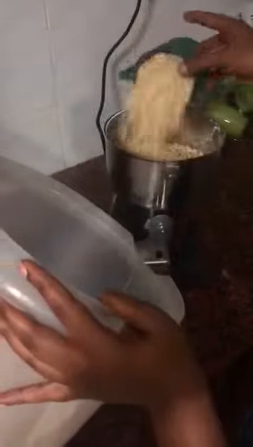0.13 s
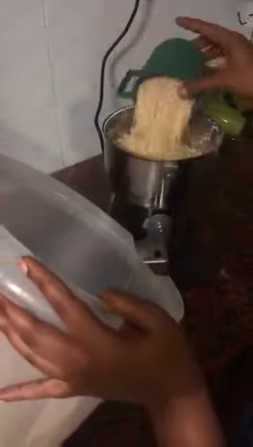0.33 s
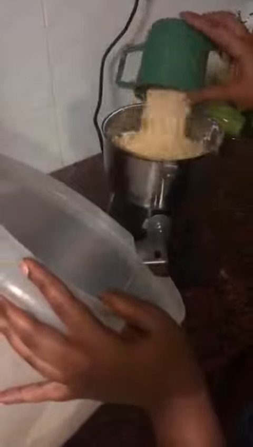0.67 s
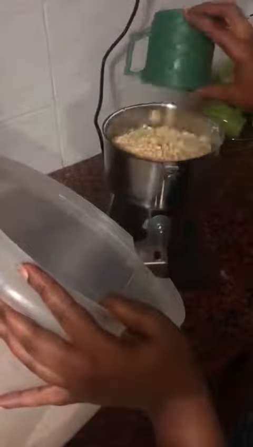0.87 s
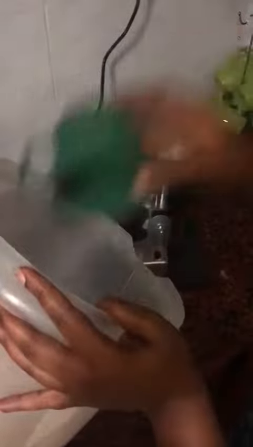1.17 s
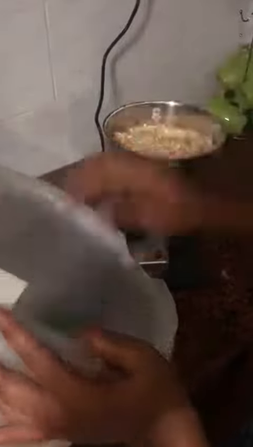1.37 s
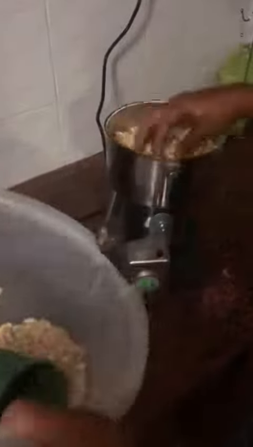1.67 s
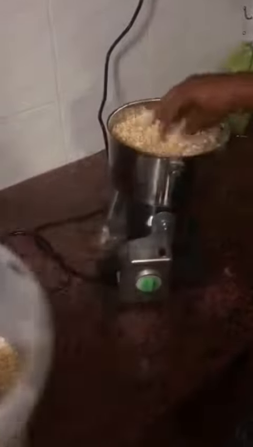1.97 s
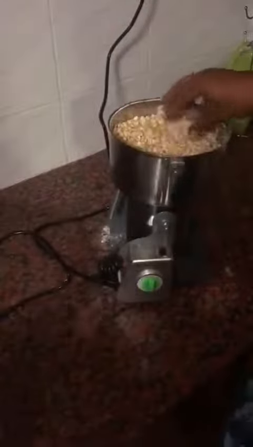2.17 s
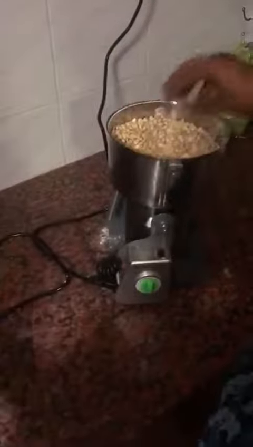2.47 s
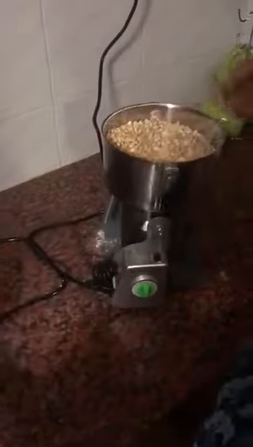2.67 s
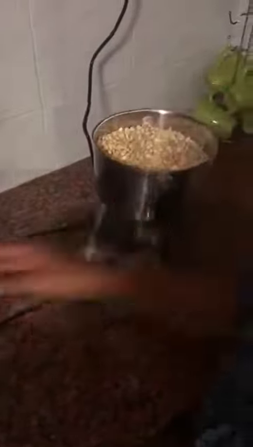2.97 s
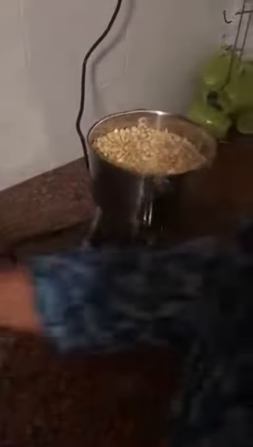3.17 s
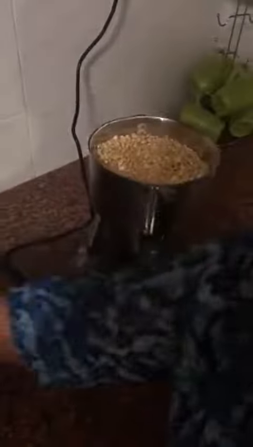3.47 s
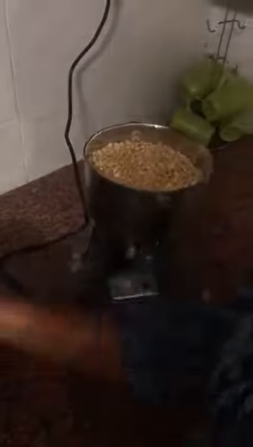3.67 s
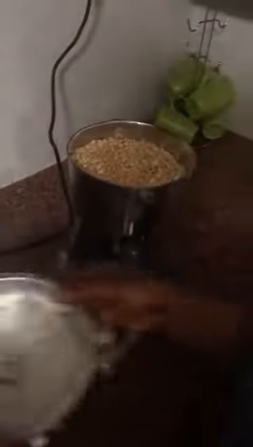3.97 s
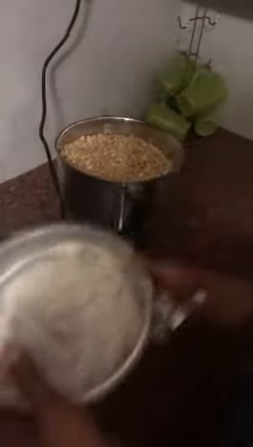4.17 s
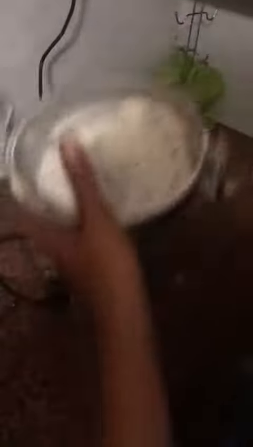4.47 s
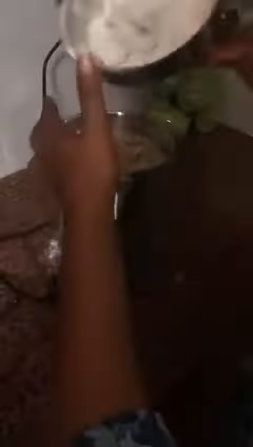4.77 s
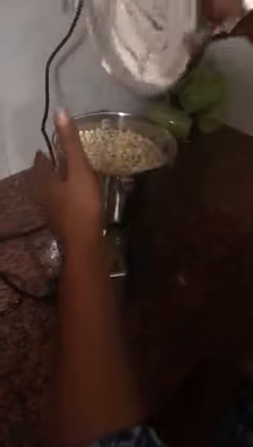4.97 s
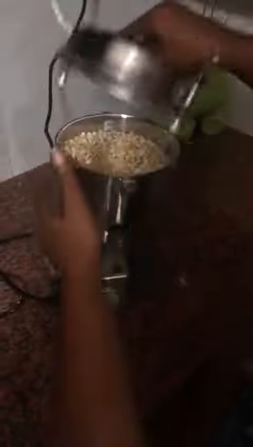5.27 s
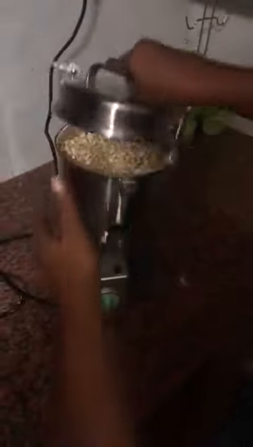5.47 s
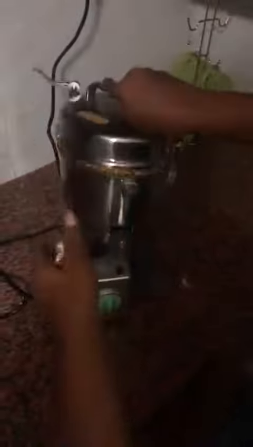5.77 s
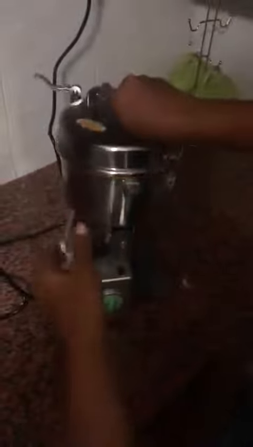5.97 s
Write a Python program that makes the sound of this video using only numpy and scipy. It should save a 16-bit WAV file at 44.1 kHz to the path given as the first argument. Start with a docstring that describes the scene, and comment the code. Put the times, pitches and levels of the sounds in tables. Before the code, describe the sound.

Hard grain streams into a small steel mill, a cup drops with a sharp plastic crack, and a lid is knocked into place.

```python
"""Dry kernels are poured from a plastic cup into the steel bowl of a small mill: random tiny impacts
sound dull on the heap, ring on the steel and tick with their husks. The cup drops into a plastic basin,
a hand levels the heap, and the basin is put aside with its grain sliding, snapping and bumping.
Sleeves rustle as filtered noise, then the steel lid is lifted and knocked into place with noisy contacts
and ringing tones. No motor runs; a quiet kitchen lies behind, and both channels are the same."""
import sys
import numpy as np
from scipy import signal
from scipy.fft import rfft, irfft
from scipy.io import wavfile
from scipy.ndimage import uniform_filter1d

SR = 44100
rng = np.random.default_rng(int(sys.argv[2]) if len(sys.argv) > 2 else 0)


def inscribe(sig):
    """Save sig as 16-bit PCM at rate SR to the path in sys.argv[1].

    A 1-D sig is mono; a 2-D sig holds one channel per row.
    Samples are clipped to [-1, 1] before scaling.
    """
    pcm = np.round(np.clip(np.atleast_2d(sig).T, -1, 1) * 32767)
    wavfile.write(sys.argv[1], SR, pcm.astype(np.int16))


N = 269892
TIME = np.arange(N) / SR
RING_TIME = TIME[:SR // 2]  # half a second for each single sound

# Tone colour of kernels on steel. Each row: frequency in Hz, level in dB.
STEEL_COLOUR = [(500, -32.5), (1200, -15), (3700, -18), (4700, 3), (5500, 1), (6400, -2.5), (7300, 0.5),
                (8300, -8.5), (12000, -8)]
# Tone colour of hard husks. Each row: frequency in Hz, level in dB.
HUSK_COLOUR = [(2000, -33.5), (6500, -17), (8000, -6.5), (8800, 2.5), (10000, 0.5), (10800, -6.5),
               (12000, -7)]


def amp(db):
    """Turn decibels into a gain."""
    return 10 ** (np.asarray(db) / 20)


def unit(x):
    """Scale a sound to an average strength (rms) of 1."""
    return x / np.sqrt(np.mean(x ** 2))


def unit_in(x, band):
    """Scale so that the part within a band (Hz) has an rms of 1."""
    hz = np.arange(N // 2 + 1) * SR / N
    inside = (hz > band[0]) & (hz < band[1])
    return x / np.std(irfft(rfft(x) * inside, N))


def colour(x, points):
    """Filter through (Hz, dB) points without any sound before its cause (minimum phase)."""
    size = 4096
    hz, db = np.transpose(points)
    grid_hz = np.arange(size // 2 + 1) * SR / size + 1
    log_gain = np.log(amp(np.interp(np.log(grid_hz), np.log(hz), db)))
    # folding the cepstrum makes the filter respond as early as it can
    cepstrum = irfft(log_gain)[:size // 2]
    cepstrum[1:] *= 2
    response = irfft(np.exp(rfft(cepstrum, size)))
    return signal.fftconvolve(x, response)[:len(x)]


def tilted(x, slope_db):
    """Brighten or dull by so many dB an octave, around 1500 Hz."""
    octaves = np.arange(-3, 4)
    return colour(x, np.column_stack([1500 * 2. ** octaves, slope_db * octaves]))


def noise():
    """Steady random hiss as long as the scene."""
    return rng.standard_normal(N)


def patter(per_second, spread_db):
    """Tiny impacts at random moments, most weak and a few strong."""
    struck = rng.random(N) < per_second / SR
    size = amp(spread_db * np.minimum(rng.exponential(size=N), 4))
    return unit(struck * size * rng.choice([-1, 1], N))


def burst(fade_s):
    """A rough contact: noise that dies away."""
    return rng.standard_normal(len(RING_TIME)) * np.exp(-RING_TIME / fade_s)


def ring(modes, rattle=0):
    """Fading tones from (Hz, dB, seconds to fall 60 dB); with rattle, each wavers on its own."""
    hz, db, t60 = np.transpose(modes)[:, :, None]
    phase = rng.uniform(0, 2 * np.pi, hz.shape)
    wobble = rng.standard_normal((len(hz), len(RING_TIME)))
    waver = 1 + rattle * unit(uniform_filter1d(wobble, size=600, mode="wrap"))
    tones = np.sin(2 * np.pi * hz * RING_TIME + phase)
    return np.sum(waver * amp(db - 60 * RING_TIME / t60) * tones, axis=0)


def blow(contact_s, crack, modes, ring_db):
    """The noise of a contact and the modes that swell under it and ring on."""
    build_up = 1 - np.exp(-2 * RING_TIME / contact_s)
    contact = unit(colour(burst(contact_s), crack))
    return contact + amp(ring_db) * unit(ring(modes, rattle=0.44) * build_up)


def add(track, s, sound, db):
    """Mix in a sound at time s; db is the level of its loudest 4 ms."""
    start = int(s * SR)
    loudest = np.sqrt(uniform_filter1d(sound ** 2, size=176).max())
    part = sound[:N - start]
    track[start:start + len(part)] += part * amp(db) / loudest


def swell(s, rise_s, hold_s, fall_s):
    """An envelope that rises to 1 at time s, holds and dies away."""
    before, after = np.maximum(s - TIME, 0), np.maximum(TIME - s - hold_s, 0)
    return np.exp(-before / rise_s - after / fall_s)


def crests(table):
    """Joint gain of overlapping swells, each with crest time (s), dB, rise (s) and fall (s)."""
    return np.sqrt(sum((amp(db) * swell(s, rise_s, 0, fall_s)) ** 2 for s, db, rise_s, fall_s in table))


def fader(table):
    """Gain along (s, dB) points, faded out beyond their ends."""
    s, db = np.transpose(table)
    return amp(np.interp(TIME, s, db)) * swell(s[0], .06, s[-1] - s[0], .06)


def pour():
    """The stream of kernels from the cup swells and thins out as its flow changes."""
    # Flow out of the cup. Each row: time in seconds, flow level in dB.
    cup_flow = [(0.0, -60), (0.068, -53.5), (0.278, -53), (0.48, -46), (0.532, -42.5), (0.748, -43),
                (0.994, -57), (1.036, -59.5), (1.25, -79)]
    return kernels(fader(cup_flow), heap_db=-2.5, steel_db=3, husk_db=1.0, ring_db=-4.5)


def levelling():
    """A hand pushes through the heap in one stroke, which moves the kernels like a short stream."""
    # The stroke. Its only row: start in seconds, length in seconds, flow level in dB.
    hand_stroke = (1.78, 0.37, -56)
    start_s, length_s, db = hand_stroke
    flow = amp(db) * swell(start_s, rise_s=0.021, hold_s=length_s, fall_s=0.063)
    return kernels(flow, heap_db=-1.5, steel_db=6.5, husk_db=6, ring_db=-5.5)


def kernels(flow, heap_db, steel_db, husk_db, ring_db):
    """Moving kernels: dull on the heap; what spills rings on the steel, with the bright ticks of hard husks."""
    # Tone colour of kernels on the heap. Each row: frequency in Hz, level in dB.
    heap_colour = [(35, -22), (78, -2), (125, -8.5), (300, -13.5), (400, -10), (600, -2.5), (1000, -7.5),
                   (2200, -2), (4000, -1.5), (7000, -5), (12000, -10.5)]
    # a thicker stream spills more onto the steel: extra dB per dB of flow, around a full flow
    spill_per_db, full_flow_db = 0.1, -43.5
    spill = flow * (flow / amp(full_flow_db)) ** spill_per_db
    heap = unit_in(colour(patter(5000, 1.3), heap_colour), (500, 2000))
    steel = on_steel(patter(3000, 4.6), ring_db)
    husks = unit(colour(patter(2800, 3.3), HUSK_COLOUR))
    return amp(heap_db) * flow * heap + amp(steel_db) * spill * steel + amp(husk_db) * spill * husks


def on_steel(impacts, ring_db):
    """Kernels tick on the bowl and set it ringing, less so while the heap cushions them."""
    # Tones of the steel bowl. Each row: frequency in Hz, level in dB, seconds to fall 60 dB.
    bowl_modes = [(3090, -14, .08), (3910, -12, .11), (4510, -6, .08), (4740, 1, .035), (5085, -2, .09),
                  (5250, -6, .05), (5855, -3, .1), (6055, -4, .12), (6778, -4, .11), (7807, -1.5, .07),
                  (10000, -2, .025), (10690, -12, .07), (11500, -10, .08)]
    # How freely the bowl rings; less while the stream lands on the heap.
    # Each row: time in seconds, change of the ringing in dB.
    bowl_freedom = [(.36, -2), (.5, -7.5), (1.2, -4), (1.75, -2)]
    freedom = amp(np.interp(TIME, *np.transpose(bowl_freedom)))
    ringing = unit(signal.fftconvolve(impacts, ring(bowl_modes, rattle=.4))[:N])
    return unit(unit(colour(impacts, STEEL_COLOUR)) + amp(ring_db) * freedom * ringing)


def clumps():
    """Whole clumps break loose and spray into the bowl; its floor rings until it is buried."""
    # Clumps spraying into the bowl, from the pour and under the levelling hand.
    # Each row: start in seconds, level in dB, length in seconds, husk ticks over steel in dB.
    clump_sprays = [(0.091, -28.5, 0.0054, 3.5), (0.166, -28.5, 0.024, -2.5), (0.214, -29, 0.05, -1),
                    (0.28, -25.5, 0.0095, 1), (0.331, -27.5, 0.035, -3), (0.392, -38, 0.077, -1),
                    (0.564, -37, 0.026, 13), (0.623, -25.5, 0.011, -3.5), (.658, -29, 0.031, 2.5),
                    (0.71, -35.5, 0.011, 13), (0.812, -34, 0.047, -1.5), (0.893, -39.5, 0.088, 3),
                    (0.991, -28, 0.037, 1.5), (1.883, -35.5, 0.0057, 1), (1.915, -43.5, 0.026, -3),
                    (1.937, -38.5, 0.031, 4)]
    # Kernels drumming on the still uncovered floor. Each row: time in seconds, level in dB.
    bare_floor = [(.05, -51.5), (.085, -41.5), (.13, -53), (.19, -42), (.31, -39.5), (.40, -51.5)]
    # Tones of the bowl's floor. Each row: frequency in Hz, level in dB, seconds to fall 60 dB.
    floor_modes = [(1375, -2, .04), (2466, 8, .018), (2500, -4, 0.013), (3060, -13, 0.079)]
    steel = on_steel(patter(5000, 2.8), ring_db=2.0)
    husks = unit(colour(patter(5000, 2.6), HUSK_COLOUR))
    drumming = signal.fftconvolve(patter(250, 3.3), ring(floor_modes))[:N]
    out = fader(bare_floor) * unit(drumming)
    for s, db, length_s, husk_db in clump_sprays:
        envelope = swell(s, rise_s=0.0021, hold_s=length_s, fall_s=0.029)
        out += amp(db) * envelope * unit(steel + amp(husk_db) * husks)
    return out


def rim_ticks():
    """Kernels flicked by the fingers tick brightly on the steel rim: short bursts of noise."""
    # The ticks. Each row: time in seconds, level in dB, fading time in seconds.
    flicks = [(2.092, -32.5, 0.0089), (2.177, -32.5, 0.0075)]
    out = np.zeros(N)
    for s, db, fade_s in flicks:
        steel = unit(colour(burst(fade_s), STEEL_COLOUR))
        husk = unit(colour(burst(fade_s), HUSK_COLOUR))
        add(out, s, steel + amp(2) * husk, db)
    return out


def cup():
    """The cup chatters on the basin; each contact cracks and shakes the grain, and the landing rings the plastic."""
    # The cup lands, chatters and skids to rest.
    # Each row: time in seconds, level in dB, contact time in seconds.
    contacts = [(1.5126, -13, 0.00022), (1.5149, -9.5, 0.0019), (1.5245, -21, 0.027), (1.544, -35, 0.015),
                (1.614, -36, 0.019), (1.635, -31, 0.01), (1.815, -42.5, .008)]
    # Tone colour of the cracks. Each row: frequency in Hz, level in dB.
    crack_colour = [(80, -19.5), (240, -14.5), (340, -15.5), (540, -2.5), (830, -9.5), (1200, -14),
                    (1720, -2), (2600, -6.5), (3300, -1), (4500, -1), (6500, -4.5), (8500, -9),
                    (12000, -16.5)]
    # Tones of the cup and the basin under it. Each row: frequency in Hz, level in dB, seconds to fall 60 dB.
    plastic_modes = [(517, -8.5, .15), (620, -9, .16), (1367, -14, .16), (1699, -1, .17), (1742, -8, .33),
                     (1785, -2, .09), (2110, -7, .14), (2230, -4, .12), (3055, -3, .15), (3190, -3, .14),
                     (3383, -3, .2), (3895, -1, .15), (4330, -2, .12), (4560, -3, .14), (4760, 1, .13),
                     (4953, -5, .14), (5443, -6, .16), (5845, -1, .14), (6272, -5, .14), (6590, -1, .13),
                     (6960, -1, .13), (7224, -6, .13), (8096, -8, .14), (9300, -5, .12), (9820, -7, .11)]
    out = np.zeros(N)
    for s, db, contact_s in contacts:
        crack = unit(burst(contact_s)) + amp(-9) * unit(burst(.02))
        add(out, s, colour(crack, crack_colour), db)
    landing = ring(plastic_modes, rattle=.3) * (1 - np.exp(-RING_TIME / 0.0041))
    add(out, 1.511, landing, db=-18)
    return out


def basin():
    """The basin is tipped and moved: its grain slides, and its plastic flexes, snaps and bumps."""
    return sliding_grain() + flexing_wall() + snaps_and_bumps()


def sliding_grain():
    """Grain slides in many small slips that patter and hiss; the hiss also bursts out in avalanches."""
    # Grain sliding in the basin. Each row: time in seconds, slide level in dB.
    slide_levels = [(1.95, -52.5), (2.05, -49), (2.23, -47), (2.31, -38), (2.53, -40.5), (2.7, -42),
                    (2.83, -44.5), (2.94, -51), (3.03, -75)]
    # The heap gives way in rushes. Each row: crest in seconds, level in dB, rise and fall in seconds.
    avalanches = [(2.45, -38.5, .1, .09), (2.513, -23, .012, 0.012)]
    # Tone colour of the sliding grain. Each row: frequency in Hz, level in dB.
    grain_colour = [(150, -6), (400, -9), (650, -5.5), (880, -6), (1500, 1.5), (2100, -0.5), (3200, -8),
                    (5500, -14), (8000, -14), (12000, -18.5)]
    # Tone colour of the hiss. Each row: frequency in Hz, level in dB.
    hiss_colour = [(900, -64.5), (2300, -13), (3200, 7.5), (4200, 0.5), (5100, 2.5), (6200, -2),
                   (8000, -13.5), (10000, -13), (12000, -29.5)]
    # stronger sliding hisses more: hiss at full slide, extra dB per dB of slide, full slide
    hiss_db, hiss_per_db, full_slide_db = -44.5, .5, -39.5
    slide = fader(slide_levels)
    steady_hiss = amp(hiss_db) * (slide / amp(full_slide_db)) ** (1 + hiss_per_db)
    hiss_gain = np.hypot(steady_hiss, crests(avalanches))
    # the level wavers at random, by 1.3 dB rms
    slips = amp(1.3 * unit(uniform_filter1d(noise(), size=350)))
    grain = unit_in(colour(patter(1400, 2.1), grain_colour), (900, 2500))
    hiss = unit(colour(patter(1600, 3.3), hiss_colour))
    return amp(-2.0) * slide * slips * grain + hiss_gain * slips * hiss


def flexing_wall():
    """The wall of the basin flexes under the hand: low, filtered noise that swells and fades."""
    # The flexes. Each row: crest in seconds, level in dB, rise and fall in seconds.
    flexes = [(2.16, -49, 0.06, 0.042), (2.315, -39.5, .025, 0.04), (2.55, -52, .1, .09),
              (2.9, -55.5, .12, 0.077)]
    # Tone colour of the wall. Each row: frequency in Hz, level in dB.
    flex_colour = [(30, -10), (55, -12), (78, 10), (110, 2.5), (200, -9.5), (262, 5.5), (320, -5.5),
                   (500, -24.5), (1500, -44)]
    return crests(flexes) * unit(colour(noise(), flex_colour))


def snaps_and_bumps():
    """The basin creaks, kernels snap against it, and it bumps softly: short bursts of noise."""
    # Creaks and snaps. Each row: time in seconds, level in dB, treble tilt in dB per octave.
    snaps = [(2.063, -32, 13), (2.102, -35, 4), (2.131, -34, 3.5), (2.293, -30.5, 7.5), (2.364, -33, -1.5),
             (2.495, -25.5, -9.5), (2.504, -29.5, -1.5), (2.516, -28.5, -3), (2.579, -36, 5),
             (2.643, -31.5, -4), (2.649, -29, -1), (2.657, -37, -6), (2.682, -30, -2.5), (2.717, -31, 6.5),
             (2.765, -32, 8), (2.805, -26.5, 2.5), (2.865, -26, 3), (2.917, -26, 3.5), (3.263, -45.5, 4.5),
             (3.466, -53, 8)]
    # Tone colour of the plastic. Each row: frequency in Hz, level in dB.
    plastic_colour = [(100, -57.5), (600, 1), (1000, -3), (1500, 8), (2200, 6), (3500, 5), (5500, 1),
                      (8000, -11), (12000, -18)]
    # Soft bumps. Each row: time in seconds, level in dB, pitch of the thud in Hz, contact time in seconds.
    bumps = [(1.404, -54, 396, 0.01), (2.112, -49, 194, 0.0072), (2.143, -61, 200, 0.0081),
             (2.268, -36, 240, 0.014), (2.287, -35, 125, .013), (2.498, -34, 238, 0.0057),
             (2.861, -49, 243, .0065), (3.467, -55, 235, .01), (3.537, -46, 225, 0.011)]
    # Tone colour of a thud. Each row: multiple of its pitch, level in dB.
    thud_colour = [(.2, -25.5), (.45, -12.5), (.75, 0), (1.2, 2), (1.8, -6.5), (3.2, -19.5), (10, -49.5)]
    out = np.zeros(N)
    for s, db, tilt_db in snaps:
        snap = unit(burst(0.0034)) + amp(-4.0) * unit(burst(0.011))
        add(out, s, tilted(colour(snap, plastic_colour), tilt_db), db)
    for s, db, pitch_hz, contact_s in bumps:
        soft_hit = burst(contact_s) * (1 - np.exp(-RING_TIME / contact_s))
        pitched_colour = [(multiple * pitch_hz, level_db) for multiple, level_db in thud_colour]
        add(out, s, colour(soft_hit, pitched_colour), db)
    return out


def lid():
    """The lid knocks and rings while carried, then clunks and clicks on the rim and rocks the mill."""
    return lifted_lid() + seated_lid()


def lifted_lid():
    """The lid knocks as it is lifted and carried: contact noise with freely ringing steel."""
    # The knocks. Each row: time in seconds, level in dB, treble tilt in dB per octave,
    # ring over contact in dB, contact time in seconds.
    lifts = [(4.057, -35.5, 4.5, -2, 0.012), (4.397, -48, -7.5, 3, 0.0043), (4.425, -66, -6, -3, .005),
             (4.56, -56.5, -10, 1, 0.005), (4.725, -60, -6, 4, 0.018)]
    # Tones of the free lid. Each row: frequency in Hz, level in dB, seconds to fall 60 dB.
    free_modes = [(628, -4.5, 0.23), (734, 2, 0.09), (846, -7, 0.094), (1135, -6.5, 0.2), (1380, -26, .15),
                  (1540, -4, 0.2), (1700, -20, 0.17), (2110, 2.5, 0.073), (2670, -25, .2), (4460, -8, 0.07),
                  (5370, -6, 0.062)]
    # Tone colour of the contacts. Each row: frequency in Hz, level in dB.
    lift_colour = [(150, -24), (500, -9), (720, 2), (1000, -15), (1600, 14.5), (2200, -6), (3200, -16),
                   (5600, -10), (9000, -41), (12000, -31)]
    out = np.zeros(N)
    for s, db, tilt_db, ring_db, contact_s in lifts:
        add(out, s, tilted(blow(contact_s, lift_colour, free_modes, ring_db), tilt_db), db)
    return out


def seated_lid():
    """Each knock on the rim clunks the lid, clicks the metal and thumps the mill; pressing rocks the mill."""
    # The lid meets the rim. Each row: time in seconds, clunk in dB, ring over contact of the clunk in dB,
    # metal click in dB, thump of the mill in dB, basic contact time in seconds (stretched for each part).
    knocks = [(5.708, -35.5, 6.5, -35, -59, 0.0041), (5.899, -40.5, -0.5, -52, -65, .0047),
              (5.996, -54, -1, -76, -45.5, 0.0031), (6.021, -34, -3.5, -45.5, -41.5, 0.0079),
              (6.044, -51, 8, -63, -43, 0.0014), (6.07, -46.5, -1, -66, -48, .0039),
              (6.106, -45, -7, -59, -45.5, 0.0039)]
    # Tones of the lid on the rim. Each row: frequency in Hz, level in dB, seconds to fall 60 dB.
    seated_modes = [(440, -8, .08), (497, 0, .11), (560, -6, .06), (620, -.5, .2), (775, -7, .14),
                    (1060, -18, .08), (1680, -16, .17), (2200, -24, .08)]
    # Tones of the rim. Each row: frequency in Hz, level in dB, seconds to fall 60 dB.
    rim_modes = [(5170, 0, .06), (5260, -1, .05), (5900, -4, .08), (6250, -6, .1), (7133, -8, .1),
                 (7623, -2, .05), (8204, -8, .17), (9243, -9, .12)]
    # Tones of the mill. Each row: frequency in Hz, level in dB, seconds to fall 60 dB.
    mill_modes = [(82.6, -9, 0.51), (278, -4, 0.33), (332, 4, 0.12), (1023, 1, 0.11), (1194, -6, 0.08)]
    # Tone colour of the clunk. Each row: frequency in Hz, level in dB.
    clunk_colour = [(40, -27.5), (150, -22.5), (300, -15.5), (480, 1.5), (650, -7.5), (880, -13.5),
                    (1100, -11), (1500, -18.5), (2200, -21.5), (4000, -30), (12000, -76)]
    # Tone colour of the click. Each row: frequency in Hz, level in dB.
    click_colour = [(500, -25), (2000, -11.5), (3600, -9), (5200, 2.5), (8000, 0.5), (9500, -5.5),
                    (10500, -14), (12000, -14)]
    # Tone colour of the rocking mill. Each row: frequency in Hz, level in dB.
    rock_colour = [(25, -35), (45, 10.5), (60, -9), (80, 6), (110, -6), (200, -6), (280, -31), (380, -21),
                   (1000, -36)]
    # The mill rocks on the counter as the lid is pressed down.
    # Each row: start in seconds, length in seconds, level in dB.
    rocking = [(5.735, .21, -57.5), (6.031, .1, -55)]
    pressing = sum(amp(db) * swell(s, rise_s=0.01, hold_s=length_s, fall_s=0.037)
                   for s, length_s, db in rocking)
    out = pressing * unit(colour(noise(), rock_colour))
    for s, clunk_db, ring_db, click_db, thump_db, contact_s in knocks:
        # the clunk follows the click by about a millisecond
        add(out, s + 0.000975, blow(2 * contact_s, clunk_colour, seated_modes, ring_db), clunk_db)
        add(out, s, blow(3 * contact_s, click_colour, rim_modes, ring_db=-21), click_db)
        add(out, s, blow(2.3 * contact_s, rock_colour, mill_modes, ring_db=6.0), thump_db)
    return out


def air():
    """The lid pushes a little air against the microphone as it passes: a swell of low noise."""
    # The push of air. Each row: crest in seconds, level in dB, rise and fall in seconds.
    draught = [(4.68, -65, .09, .1)]
    # Tone colour of the air. Each row: frequency in Hz, level in dB.
    draught_colour = [(20, -6), (35, -2), (55, -3), (90, -22), (300, -45.5)]
    return crests(draught) * unit(colour(noise(), draught_colour))


def sleeves():
    """Cloth and skin brush in countless small slips; each stroke swells and fades."""
    # Strokes of sleeves and hands. Each row: crest in seconds, level in dB, rise in seconds,
    # fall in seconds, treble over the rub in dB.
    strokes = [(1.415, -61, .02, .016, -2), (3.161, -60.5, 0.12, 0.098, -9), (3.322, -61.5, .04, .13, 1),
               (3.49, -63.5, .08, 0.048, 1), (3.72, -64.5, .035, .06, -3), (3.93, -58.5, .07, 0.076, -5),
               (4.04, -54.5, 0.15, 0.13, 1.5), (4.32, -66.5, .07, 0.13, 10), (4.59, -59.5, 0.15, 0.18, -10),
               (4.78, -63, 0.092, .05, 6), (5.0, -73, 0.055, .09, 5.5), (5.4, -75.5, .03, 0.034, -3.5),
               (5.55, -70.5, .03, .08, 1.5)]
    # Tone colour of the rub. Each row: frequency in Hz, level in dB.
    cloth_colour = [(150, -28), (300, -1.5), (450, -7.5), (700, -4), (950, -2.5), (1500, -0.5),
                    (2500, -0.5), (4000, -5), (7000, -13), (12000, -21)]
    # Tone colour of the treble swish. Each row: frequency in Hz, level in dB.
    swish_colour = [(1200, -5.5), (2800, -6), (3600, 3.5), (5500, 2), (8000, -5), (10500, -5),
                    (12000, -20.5)]
    rub_gain = crests([row[:4] for row in strokes])
    swish_gain = crests([(s, db + treble_db, rise_s, fall_s) for s, db, rise_s, fall_s, treble_db in strokes])
    rub = unit_in(colour(patter(7000, 5.4), cloth_colour), (900, 3000))
    swish = unit(colour(patter(5000, 1.3), swish_colour))
    return amp(-0.5) * rub_gain * rub + amp(-4.0) * swish_gain * swish


def room(x, wet_db, low_t60, high_t60, boom_db):
    """Tiled walls: a short diffuse tail whose treble dies first, and a few low standing waves."""
    # Standing waves. Each row: frequency in Hz, level in dB, seconds to fall 60 dB.
    room_modes = [(79.5, -5, 0.59), (252, -4, 0.19), (265, -7, 0.71)]
    low_pass = signal.butter(2, 2500, fs=SR, output="sos")
    high_pass = signal.butter(2, 2500, "high", fs=SR, output="sos")
    low = signal.sosfilt(low_pass, rng.standard_normal(len(RING_TIME)))
    high = signal.sosfilt(high_pass, rng.standard_normal(len(RING_TIME)))
    tail = low * amp(-60 * RING_TIME / low_t60) + high * amp(-60 * RING_TIME / high_t60)
    tail *= RING_TIME > .005  # the tail starts after 5 ms
    boom = sum(amp(db - 60 * RING_TIME / t60) * np.cos(2 * np.pi * hz * RING_TIME)
               for hz, db, t60 in room_modes)
    response = amp(wet_db) * tail / np.linalg.norm(tail) + amp(boom_db) * boom / np.abs(rfft(boom)).max()
    return x + signal.fftconvolve(x, response)[:N]


def kitchen():
    """The quiet of the kitchen: steady filtered noise."""
    # Tone colour of the quiet. Each row: frequency in Hz, level in dB.
    kitchen_colour = [(20, -24.5), (32, -12), (55, -1.5), (100, -1), (170, 0.5), (285, 2), (400, -5),
                      (700, -7), (1000, -12), (2000, -16.5), (3700, -13), (5000, -16.5), (10000, -22.5),
                      (12000, -27)]
    return amp(-66) * unit(colour(noise(), kitchen_colour))


def scene():
    """Everything on the counter sounds in the room, over the quiet of the kitchen."""
    grain = pour() + levelling() + clumps() + rim_ticks()
    near = grain + cup() + basin() + lid() + air() + sleeves()
    in_room = room(near, wet_db=-10, low_t60=0.65, high_t60=.35, boom_db=6.5)
    return np.tile(in_room + kitchen(), (2, 1))


def record(dry):
    """Peaks are clipped at full scale, then a steep filter cuts everything above about 12 kHz."""
    top_cut = signal.ellip(12, .2, 70, 12150, fs=SR, output="sos")
    return signal.sosfilt(top_cut, np.clip(dry, -1, 1))


dry = scene()
out = record(dry)
inscribe(out)
```